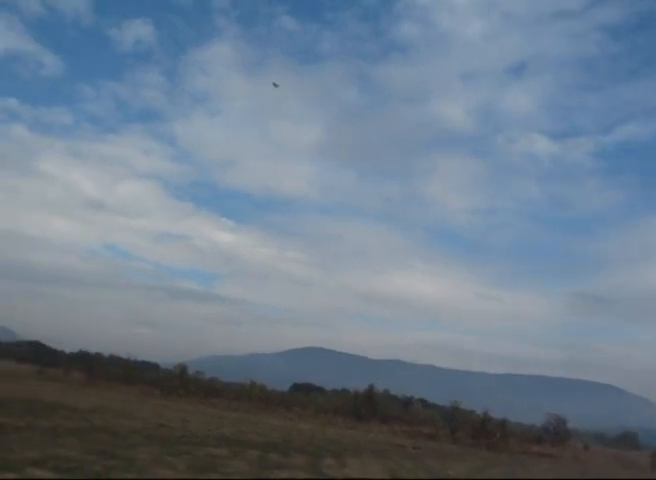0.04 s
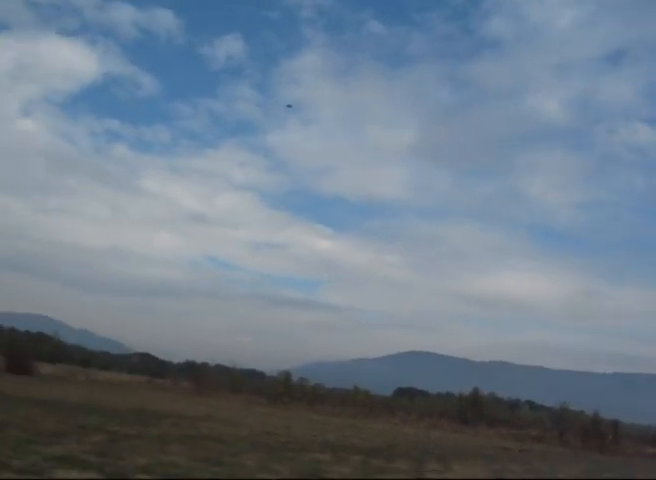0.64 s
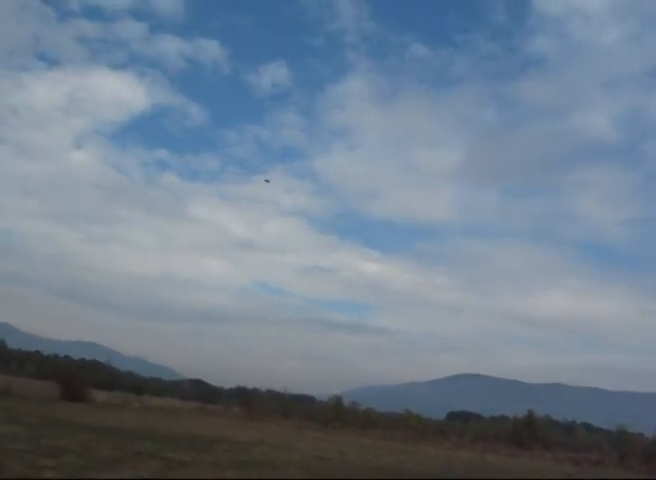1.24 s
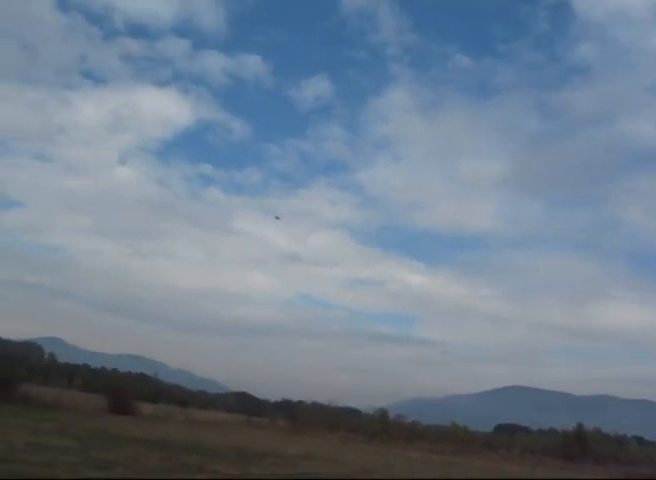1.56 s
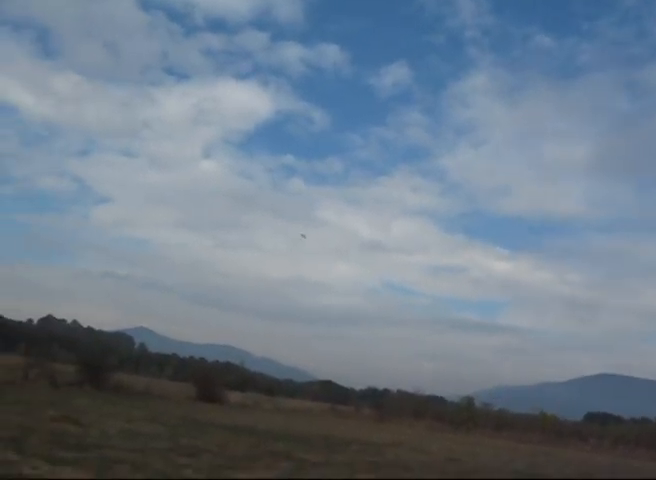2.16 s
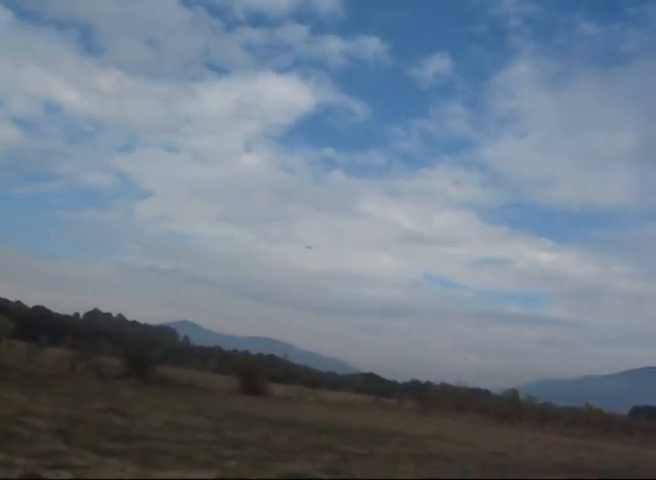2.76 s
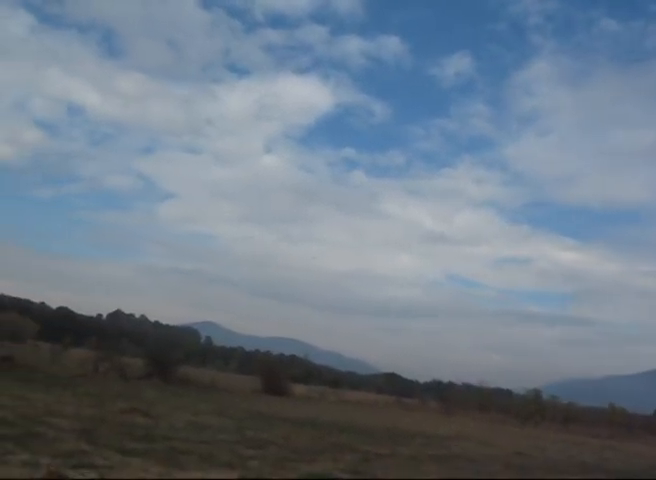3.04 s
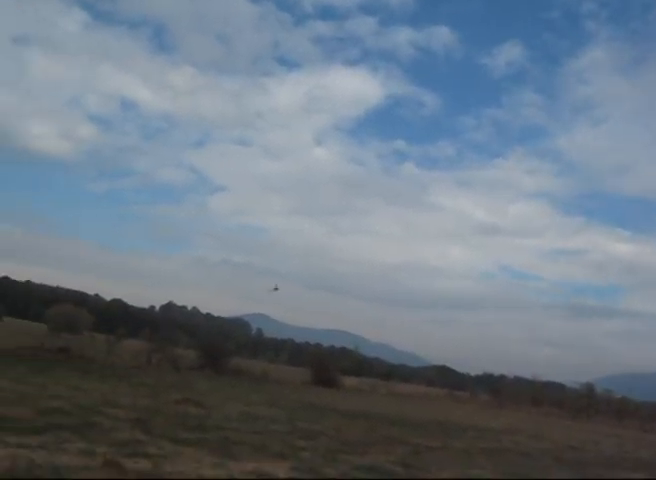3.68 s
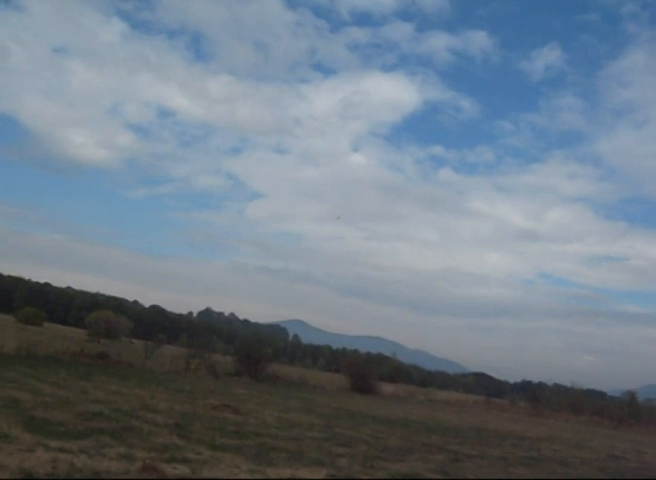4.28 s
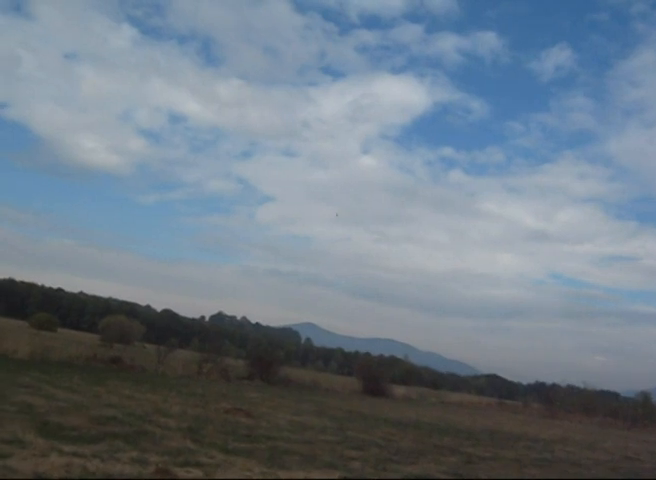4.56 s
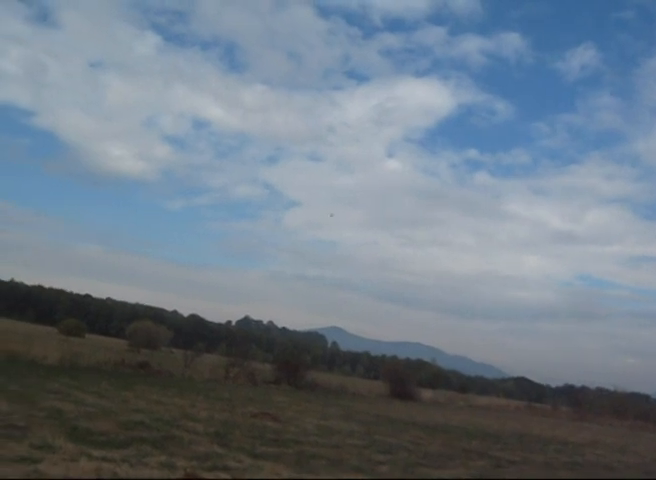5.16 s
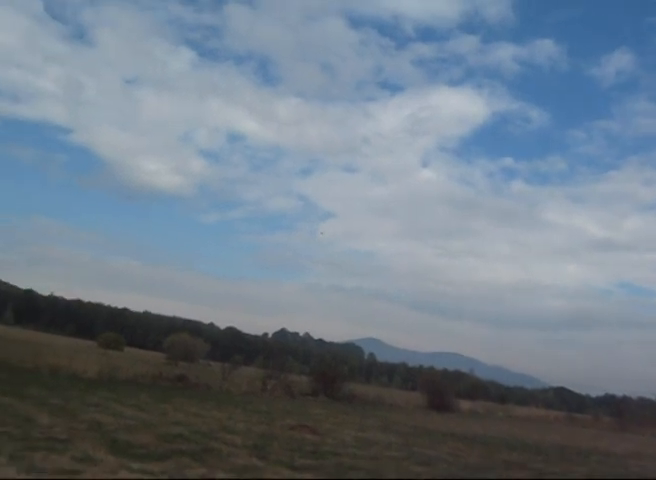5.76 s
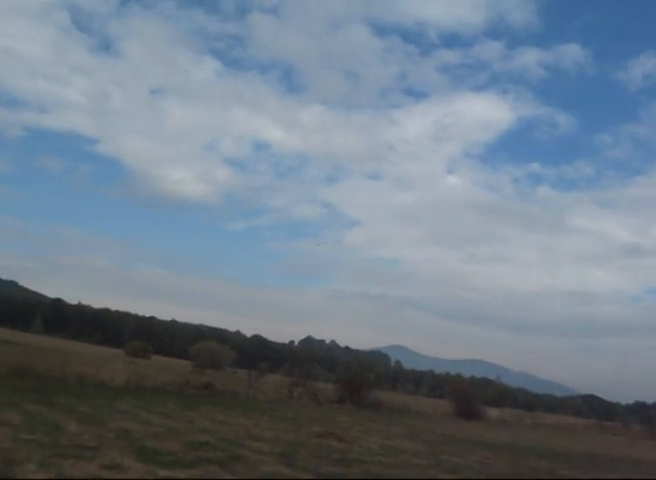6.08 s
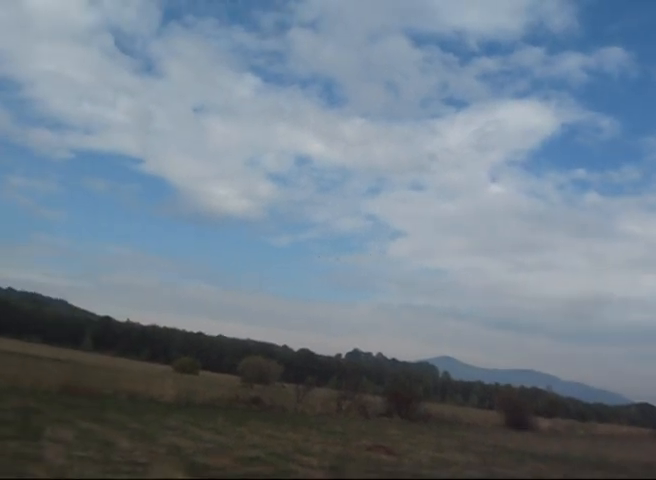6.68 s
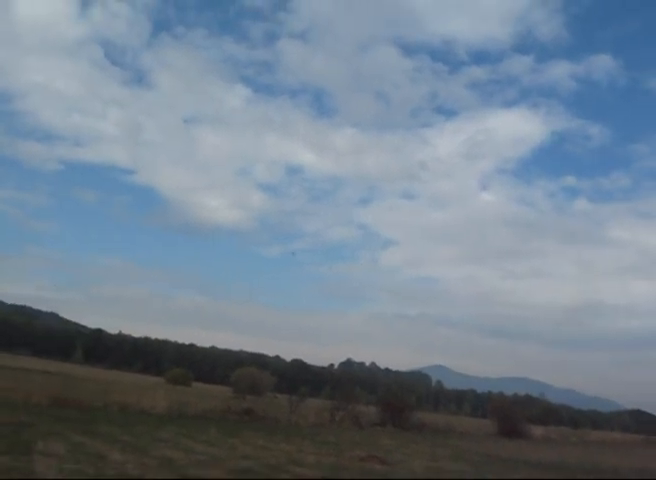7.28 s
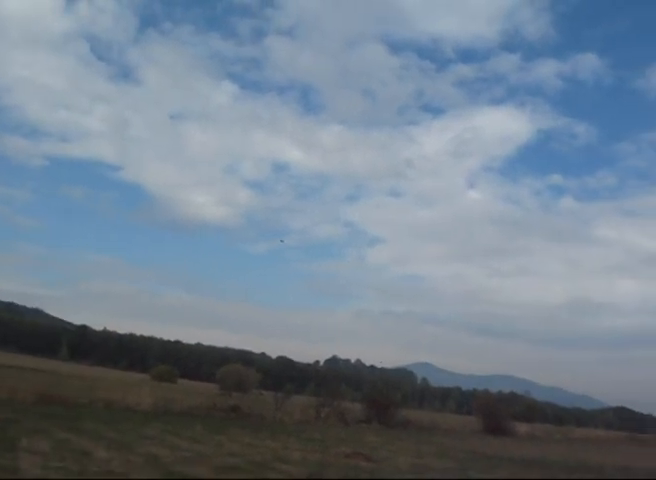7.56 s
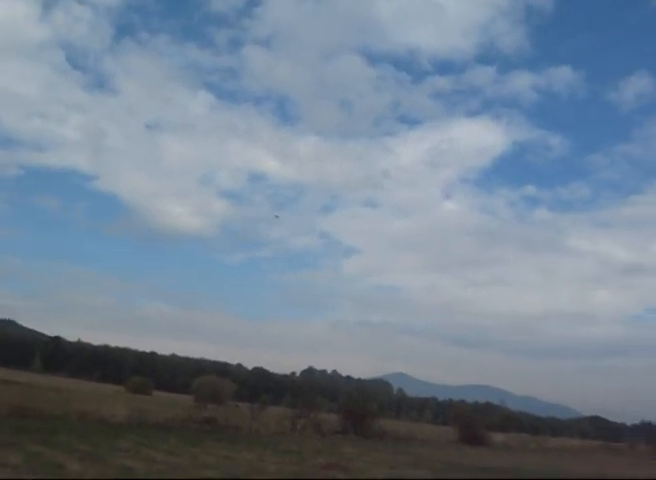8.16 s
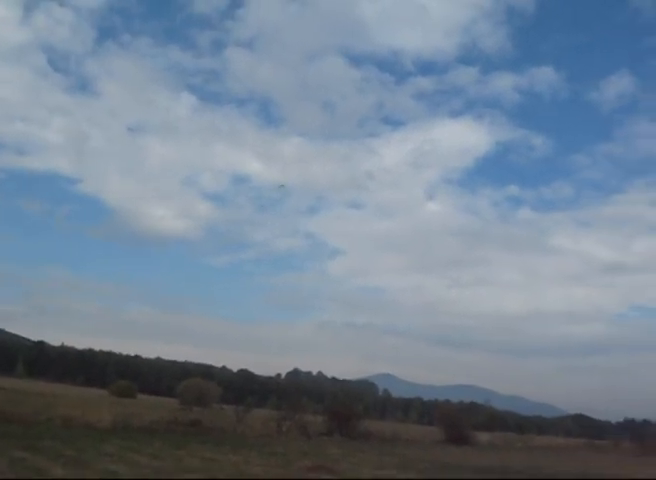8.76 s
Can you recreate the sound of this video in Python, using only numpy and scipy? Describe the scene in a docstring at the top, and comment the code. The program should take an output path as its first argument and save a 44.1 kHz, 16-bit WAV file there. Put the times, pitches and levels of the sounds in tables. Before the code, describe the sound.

The wavering drone of a small model plane engine circling outdoors, with light wind on the microphone and faint lens clicks.

```python
"""An open field, on a hand-held camera's microphone: a two-stroke model airplane circles throughout.
Each firing rings its muffler, the propeller hums, and a ground echo combs the tone as the plane turns.
At first the lens motor whirs and ticks close by, and a light breeze nudges the microphone, then eases.
From about 6 s the lens ticks again, the level dipping briefly each time, and the engine's pitch climbs.
At 7.5 s a finger knocks the camera body; soon after, the pitch falls back."""
import sys
import numpy as np
from scipy import signal
from scipy.fft import rfft, irfft, next_fast_len
from scipy.io import wavfile

SR = 44100
rng = np.random.default_rng(int(sys.argv[2]) if len(sys.argv) > 2 else 0)


def materialize(psi):
    """Save the field psi as 16-bit PCM at rate SR to the path in sys.argv[1].

    A 1-D psi becomes a single channel; in a 2-D psi each row is a channel.
    """
    bounded = np.clip(np.atleast_2d(psi).T, -1, 1)
    quanta = np.round(bounded * 32767).astype(np.int16)
    wavfile.write(sys.argv[1], SR, quanta)


N = 388943
STEP = 147  # samples per point of a slow control
TIME = np.arange(N) / SR
SLOW = TIME[::STEP]

# the buzz at the microphone as the plane nears and turns away (time [s], level [dB])
BUZZ_LEVEL = [(0.0, 2), (0.96, 7), (1.67, 7), (2.62, 7.5), (3.2, 0.3), (4.21, -2), (4.52, -7), (4.98, -1.7),
              (5.46, -6), (6.31, -0.3), (6.54, -4.5), (7.82, 3.5), (8.42, -2), (8.82, 7.5)]
# the low boom at the firing rate (time [s], level [dB])
BOOM_LEVEL = [(0.0, 8), (1.34, 11), (3.13, -2.5), (4.17, -4), (5.42, 0.6), (6.49, -12.5), (7.0, -8),
              (8.08, 1.5), (8.82, 2)]
# ticks of the lens mechanism (time [s], level [dB], dip of the outdoor sound after it [dB])
LENS_TICKS = [(.019, -24, 0), (0.1548, -12, 4), (.333, -13.5, 0.5), (.419, -9, 2), (5.988, -13.5, 3),
              (6.209, -8, 6), (6.405, -16, 4.5), (6.55, -40, 1), (6.655, -11.5, 7.5)]


def undb(db):
    """Decibels to gain."""
    return 10 ** (np.asarray(db) / 20)


def curve(table, at):
    """A table of points joined by straight lines."""
    return np.interp(at, *np.transpose(table))


def fine(control):
    return np.interp(TIME, SLOW, control)


def walk(rate_hz):
    """A slow random drift of spread 1 that changes about rate_hz times a second."""
    lowpass = signal.butter(2, min(rate_hz, 120) / 2, fs=SR / STEP, output="sos")
    drift = signal.sosfilt(lowpass, rng.standard_normal(len(SLOW)))
    return drift / drift.std()


def swell(start, hold, attack_s, release_s):
    """A slow envelope that rises, holds at 1 and dies away."""
    return np.exp(np.minimum(SLOW - start, 0) / attack_s - np.maximum(SLOW - start - hold, 0) / release_s)


def colour(x, outline):
    """Filter by an outline of (frequency [Hz], gain [dB])."""
    hz, db = np.transpose(outline)
    size = next_fast_len(N)
    bins = np.maximum(np.fft.rfftfreq(size, 1 / SR), 1)
    gain = undb(np.interp(np.log(bins), np.log(hz), db))
    return irfft(rfft(x, size) * gain, size)[:N]


def noise(outline, gate=1):
    """Gated noise of rms 1 with the given outline."""
    x = colour(gate * rng.standard_normal(N), outline)
    return x / x.std()


def strike(blows, modes):
    """Short blows on an object with damped modes."""
    t, out = TIME[:SR // 10], np.zeros(N)
    ring = sum(undb(db - 60 * t / t60) * np.sin(2 * np.pi * hz * t) for hz, db, t60 in modes)
    for start, db, *_ in blows:
        i = int(start * SR)
        out[i:i + len(t)] += undb(db) * ring
    return out


def field_air(level_db=-51.5, boom_share=0.04):
    """A soft rush over the field that grows slightly with the plane's boom."""
    # open-air background (frequency [Hz], level [dB])
    spectrum = [(20, -12), (70, -12), (160, 7), (300, 1), (600, -1.5), (1200, -1.5), (2200, -8.5),
                (4000, -22), (5500, -23.5), (6500, -37.5), (9000, -57)]
    return noise(spectrum) * undb(level_db + boom_share * curve(BOOM_LEVEL, TIME))


def breeze(trim_db=-1, buffet_db=2, weak_db=-48, strong_db=-36, calm_db=-61.5):
    """Wind on the microphone: weak gusts only thud, strong ones also flutter higher up."""
    # rumble of the breeze (frequency [Hz], level [dB])
    spectrum = [(15, -21), (40, -1), (90, -5), (150, -5.5), (300, -28.5), (1000, -61), (4000, -89.5)]
    # gusts on the microphone (start [s], hold [s], level [dB])
    gusts = [(0.04, 0.091, -36.5), (0.235, 0.065, -32.5), (0.497, .2, -37), (0.884, 0.12, -48),
             (1.473, 0.032, -49), (1.68, .06, -48.5), (1.95, 0.098, -47), (2.245, 0.16, -50),
             (2.576, .05, -43), (2.76, 0.061, -49), (4.38, 0.21, -54.5)]
    wind = sum(undb(db) * swell(start, hold, attack_s=0.022, release_s=0.034) for start, hold, db in gusts)
    flutter = fine(np.interp(wind, undb([weak_db, strong_db]), [0, 1]))
    rumble = noise(spectrum)
    thud = colour(rumble, [(50, 1.5), (110, -8.5)])
    buffeting = fine(wind * undb(trim_db + buffet_db * walk(30)))
    blown = (thud + flutter * (rumble - thud)) * buffeting
    return blown + noise(spectrum) * undb(calm_db)


def lens_motor(ramp_s=0.00067):
    """Right beside the microphone, the lens motor whines in three short runs."""
    # runs of the motor (start [s], end [s], level [dB])
    runs = [(0.063, 0.121, 1.5), (0.197, 0.25, 1), (0.383, 0.443, 0.5)]
    # partials of its whine (frequency [Hz], level [dB])
    whine = [(2390, -42), (4780, -32.5)]
    running = sum(undb(db) * np.clip(np.minimum(TIME - start, end - TIME) / ramp_s, 0, 1)
                  for start, end, db in runs)
    return running * sum(undb(db) * np.sqrt(2) * np.sin(2 * np.pi * hz * TIME) for hz, db in whine)


def lens_ticks():
    """Each tick of the mechanism briefly rings the lens barrel."""
    # modes of the barrel (frequency [Hz], level [dB], t60 [s])
    barrel = [(3500, -19.5, 0.0076), (4400, -3, 0.0041), (5200, 2.5, 0.0012)]
    return colour(strike(LENS_TICKS, barrel), [(2000, -10), (3500, -5.5), (5500, -1.5), (7000, -34.5)])


def level_dips(recover_s=0.13):
    """A gain that dips briefly after every tick but the first."""
    dip_db = sum(db * (TIME > start) * np.exp(-np.abs(TIME - start) / recover_s)
                 for start, _, db in LENS_TICKS)
    return undb(-dip_db)


def finger_knock():
    """A finger knocks the camera body, which rings dully."""
    # the finger's contacts (time [s], level [dB])
    knocks = [(7.503, -34), (7.514, -24.5)]
    # modes of the body (frequency [Hz], level [dB], t60 [s])
    body = [(620, -14, .015), (943, 1, 0.024), (1176, -13, 0.012)]
    return strike(knocks, body)


def over_grass(direct, reflection=0.46, steep_share=0.34, grass_hz=450):
    """The ground returns an inverted, delayed copy of the upper harmonics; grass soaks up steep ones."""
    # lag of the ground echo, shorter when the plane is low in the sky (time [s], lag [ms])
    echo_lag = [(0.0, 4.532), (0.64, 4.471), (1.12, 3.75), (1.41, 3.36), (1.64, 2.98), (1.77, 3.03),
                (2.57, 2.36), (3.46, 1.77), (3.91, 1.675), (4.43, 2.05), (5.29, 2.271), (6.11, 2.01),
                (6.27, 1.99), (6.44, 1.9), (7.11, 1.74), (7.74, 1.854), (8.49, 2.57), (8.82, 2.72)]
    lag_ms = curve(echo_lag, TIME)
    grazing = np.interp(lag_ms, [3.3, 3.8], [1, steep_share])
    bounce = colour(direct, [(grass_hz / 2, -14), (grass_hz, -7), (2 * grass_hz, 0), (5500, 0), (9000, -5)])
    return direct - reflection * grazing * np.interp(TIME - lag_ms / 1000, TIME, bounce)


def exhaust_gas(turns, level_db=-46.5, puff_turns=1.0, buzz_share=0.57, boom_share=0.11, grit_db=1.5):
    """A puff of hiss leaves the pipe with every firing; now and then the exhaust rasps."""
    # rush of the gas (frequency [Hz], level [dB])
    spectrum = [(150, -12.5), (500, -7), (1200, -10.5), (1650, -11), (2000, -6.5), (2600, -7), (3500, -9.5),
                (4700, -11.5), (5500, -12), (6500, -27), (9000, -56.5)]
    # one lull, then brief rasps (start [s], hold [s], change of the hiss [dB])
    surges = [(2.594, .14, -3.5), (3.385, 0.067, 9.5), (5.684, 0.31, 1.5), (7.752, 0.1, 2),
              (8.612, .18, 2.5)]
    flight_db = buzz_share * curve(BUZZ_LEVEL, SLOW) + boom_share * curve(BOOM_LEVEL, SLOW)
    surge_db = sum(db * swell(start, hold, attack_s=0.017, release_s=0.039) for start, hold, db in surges)
    puffs = noise(spectrum, gate=0.62 + np.exp(-(turns % 1) / puff_turns))
    return puffs * fine(undb(level_db + flight_db + surge_db + grit_db * walk(60)))


def ring_phases(db):
    """Phases that make each cycle start sharply and ring out (minimum phase)."""
    log_gain = np.log(undb(np.r_[db[0] - 10, db]))
    mirrored = np.r_[log_gain, log_gain[-2:0:-1]]
    return -signal.hilbert(mirrored).imag[1:len(db) + 1]


def band(k, centre, width):
    """Share of harmonic k in a bell-shaped resonance."""
    return np.exp(-((k - centre) / width) ** 2)


def engine(turns, uneven_db=0.4, twinkle_db=2.53, turbulence_db=2.0, smear_rad=0.0047, count=32):
    """One firing a turn, as a stack of harmonics; each part of the plane beams its own share of them."""
    # muffler resonances, then the falling rasp above them (harmonic [number], level [dB])
    muffler = [(1, -47), (2, -43), (3, -56.5), (4, -49), (5, -60.5), (6, -54), (7, -52.5), (8, -48.5),
               (9, -35), (10, -38.5), (11, -42), (12, -49.5), (13, -43.5), (14, -44.5), (15, -56),
               (16, -49.5)]
    rasp = [(18, -52.5), (21, -56.5), (23, -53.5), (24, -77.5), (26, -55.5), (28, -60), (32, -86)]
    # the muffler's main ring near 2 kHz (time [s], level [dB])
    ring_level = [(0.0, 1.5), (1.14, 0.5), (1.31, -5.4), (1.83, 0.3), (2.16, 0.5), (2.78, 7.5), (3.06, 3.0),
                  (3.55, -2), (4.24, -4.5), (4.36, -9), (5.25, -4), (5.64, -15), (5.87, 0.6), (6.04, -6),
                  (6.6, -10.5), (6.84, -3), (8.01, 4), (8.33, -1.1), (8.82, 3.1)]
    # the propeller's hum (time [s], level [dB])
    propeller_level = [(0.0, 4), (1.43, 2.5), (2.06, -11.5), (2.37, -3.6), (3.1, -4.5), (4.38, 4),
                       (4.71, -10), (5.43, -6.9), (5.95, 5.8), (6.7, -2.5), (7.3, -9.3), (8.1, 0.8),
                       (8.82, -2.5)]
    # the muffler chamber's note near 1.4 kHz (time [s], level over its neighbours [dB])
    chamber_level = [(0.0, 4.5), (1.65, -3.5), (2.28, 2.5), (3.29, 8.5), (4.4, -4), (5.3, 5), (5.81, -8.9),
                     (6.34, 2), (8.82, -8)]
    # the tailpipe's whine at 2.5 and 3.3 kHz (time [s], level over its neighbours [dB])
    tailpipe_level = [(0.0, -6.5), (1.2, -7), (1.31, 1.5), (2.03, -13.1), (3.46, 8.5), (4.42, -13),
                      (4.72, 5.5), (6.04, -2), (8.0, 1.3), (8.23, 15.5), (8.82, 19)]
    buzz, boom = curve(BUZZ_LEVEL, SLOW), curve(BOOM_LEVEL, SLOW)
    ring, propeller = curve(ring_level, SLOW), curve(propeller_level, SLOW)
    chamber, tailpipe = curve(chamber_level, SLOW), curve(tailpipe_level, SLOW)
    orders = np.arange(1, count + 1)
    base_db = curve(muffler + rasp, orders)
    phases = ring_phases(base_db) - smear_rad * orders ** 2  # the pipe smears each pulse a little
    turbulence, uneven = turbulence_db * walk(2.56), uneven_db * walk(100)
    out = np.zeros(N)
    for k, base, phase in zip(orders, base_db, phases):
        beaming = 1 - 0.54 * band(k, 13.6, 3.1)  # the muffler's upper ring spreads more evenly
        db = base + uneven + beaming * buzz
        db += band(k, 9.5, 2.25) * (ring - buzz)
        db += ((k == 1) + 0.34 * (k == 3)) * (boom - buzz)
        db += ((k == 2) + 0.9 * (k == 4)) * (propeller - buzz)  # two blades: even harmonics
        db += band(k, 6.5, 1.3) * chamber
        db += (band(k, 11.7, 0.97) + 0.45 * band(k, 15.4, 1.1)) * tailpipe
        # moving air makes the high harmonics twinkle most
        db += min(k / 20, 1) * (twinkle_db * walk(6.7) + turbulence)
        out += fine(np.sqrt(2) * undb(db)) * np.cos(2 * np.pi * k * turns + phase)
    return out


def airplane(waver_hz=0.1326, jitter_turns=0.0007):
    """Out over the field the engine runs a little unevenly, heard directly and off the ground."""
    # firing rate at the microphone, Doppler shift included (time [s], rate [Hz])
    firing_rate = [(0.0, 207.8), (0.05, 209.5), (0.76, 208), (1.23, 215.3), (1.42, 217.8), (1.94, 214.2),
                   (2.46, 210.4), (3.41, 212), (3.88, 208.5), (4.2, 211.7), (4.67, 211), (4.74, 207.5),
                   (4.91, 208.7), (5.01, 206.2), (5.26, 209.2), (5.5, 208.4), (6.04, 214.7), (6.53, 222.3),
                   (6.9, 230.2), (7.32, 234.5), (7.69, 235.1), (8.06, 232.1), (8.3, 217.4), (8.72, 210.1),
                   (8.79, 211), (8.82, 207)]
    jitter = jitter_turns * fine(walk(100))
    hz = curve(firing_rate, TIME) + waver_hz * fine(walk(17.3))
    turns = np.cumsum(hz) / SR + jitter
    return over_grass(exhaust_gas(turns) - engine(turns))


def scene():
    """Plane, field and breeze in mono, with the camera's own small noises in front."""
    outdoors = airplane() + field_air() + breeze()
    camera = lens_motor() + lens_ticks() + finger_knock()
    return (outdoors * level_dips() + camera)[None]


def record(dry):
    """The camera samples at a quarter of the rate, so the buzz is mirrored faintly into the treble."""
    # the camera's smoothing, which lets mirror images through above 5.5 kHz (frequency [Hz], gain [dB])
    smoothing = [(2000, 2.5), (4000, -2.5), (4780, -2.5), (5500, -6.5), (6250, -9), (7300, -18.5),
                 (8000, -24.5), (9100, -38.5), (10200, -46.5), (11500, -53), (12900, -45), (14000, -35.5),
                 (16000, -29.5)]
    top_hz = 15600
    sampled = 4 * dry[0] * (np.arange(N) % 4 == 0)
    lowpass = signal.ellip(10, .1, 70, top_hz, fs=SR, output="sos")
    return signal.sosfilt(lowpass, colour(sampled, smoothing))[None]


dry = scene()
out = record(dry)
materialize(out)
```